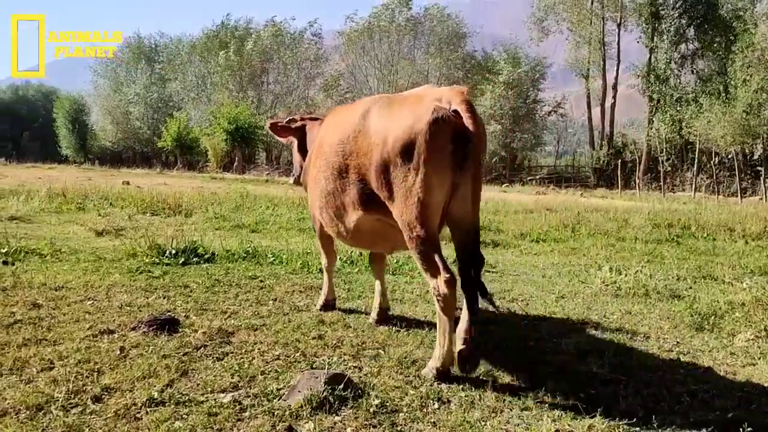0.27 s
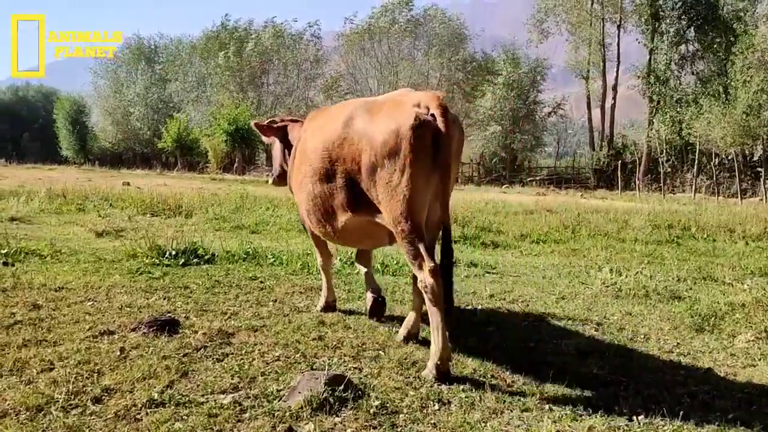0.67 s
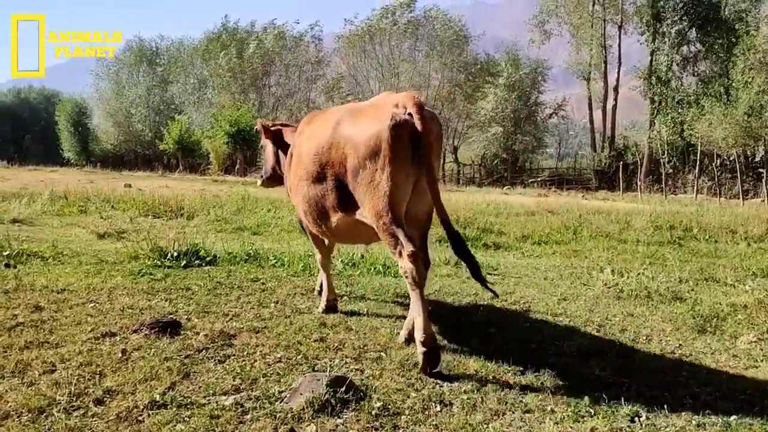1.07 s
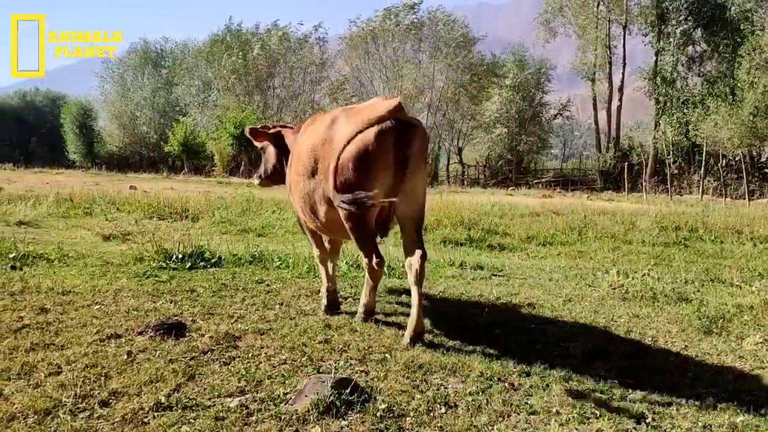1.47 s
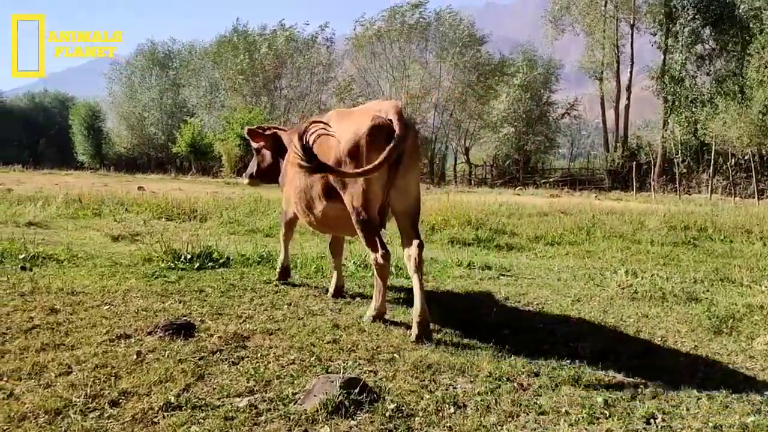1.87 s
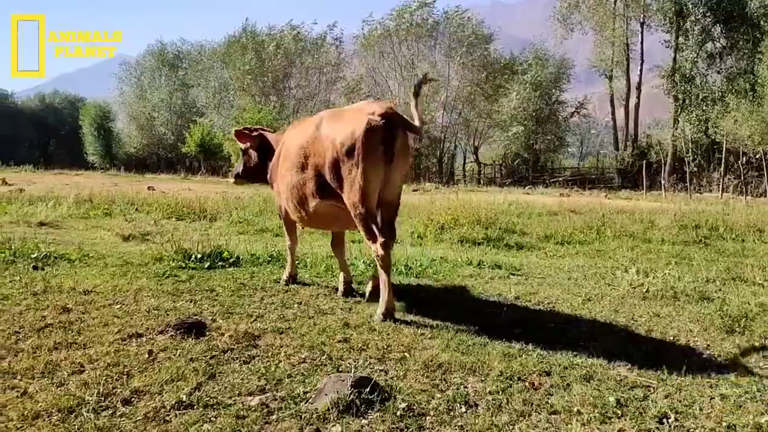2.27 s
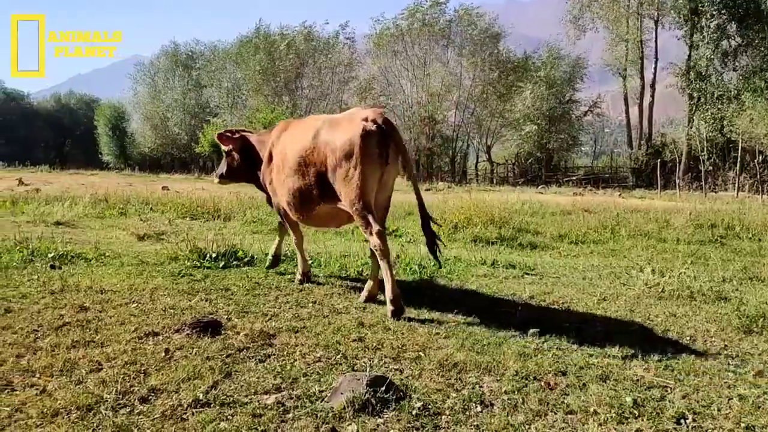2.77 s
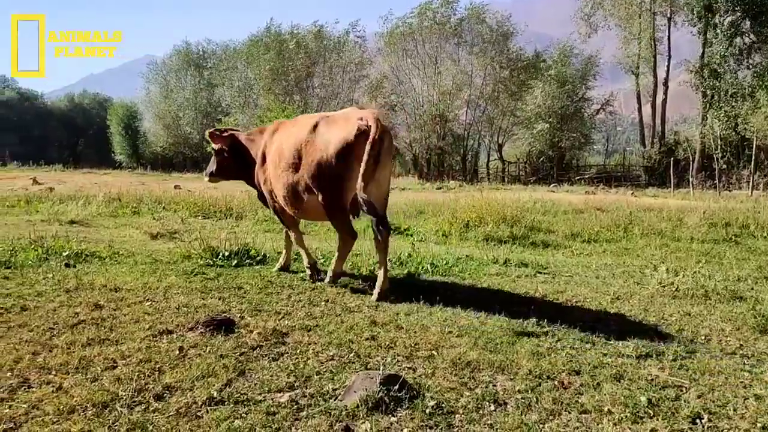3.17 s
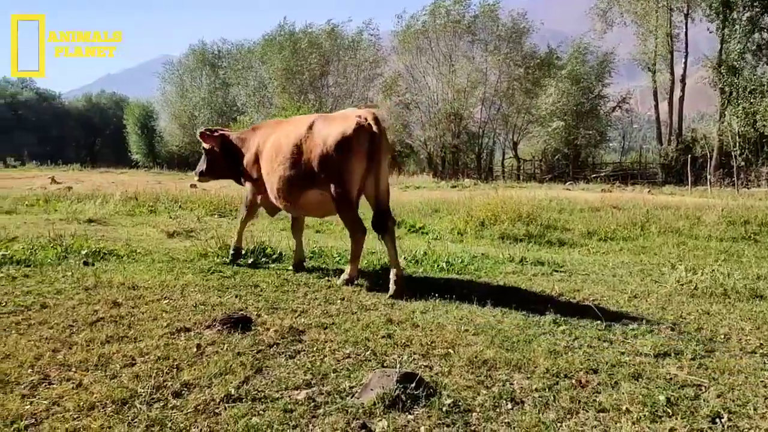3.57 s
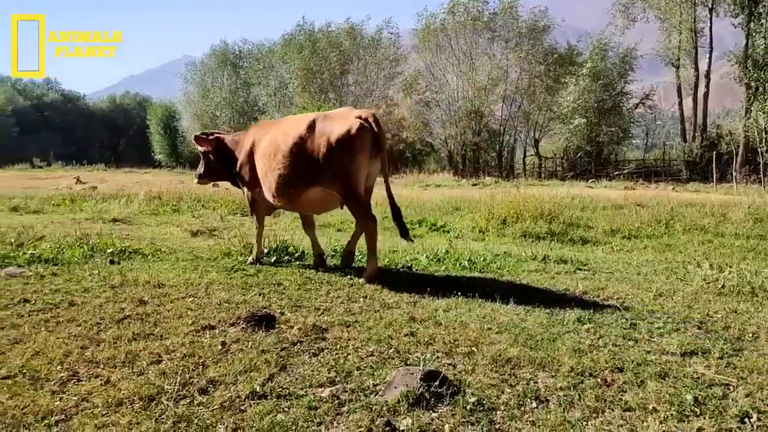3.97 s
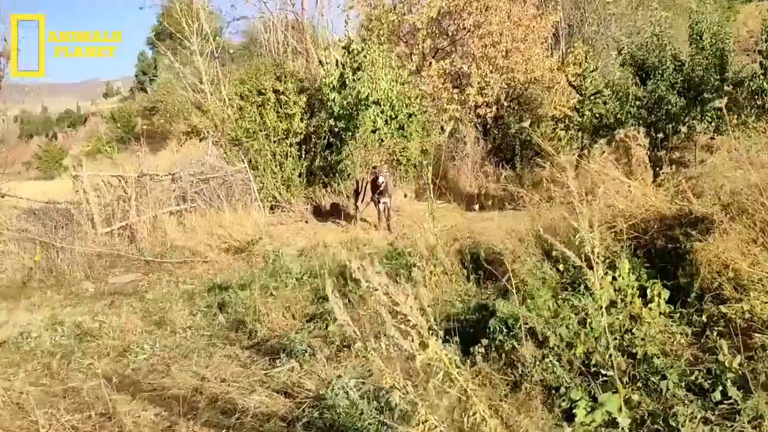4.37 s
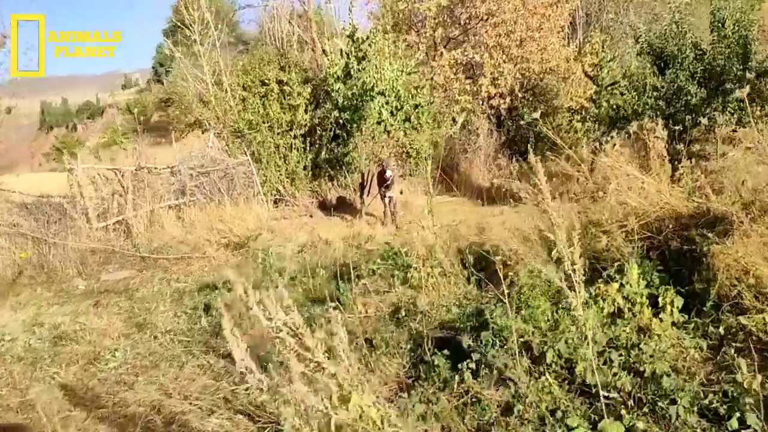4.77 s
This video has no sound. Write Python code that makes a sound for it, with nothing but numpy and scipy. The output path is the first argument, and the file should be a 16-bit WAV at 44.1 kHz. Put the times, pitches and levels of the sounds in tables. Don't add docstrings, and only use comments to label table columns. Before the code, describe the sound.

Leaf hiss, faint birds and wind buffeting, then a deep hum opening into a bellow, followed by a shorter, higher cow call and snapping dry grass.

```python
import sys
import numpy as np
from scipy import signal
from scipy.fft import rfft, irfft, next_fast_len
from scipy.io import wavfile
from scipy.ndimage import uniform_filter1d, map_coordinates

SR = 44100
rng = np.random.default_rng(int(sys.argv[2]) if len(sys.argv) > 2 else 0)


def inscribe(sig):
    pcm = np.round(np.clip(np.atleast_2d(sig).T, -1, 1) * 32767)
    wavfile.write(sys.argv[1], SR, pcm.astype(np.int16))


def magnitude_from_level(level_db):
    exponent = np.asarray(level_db, float) / 20
    return 10 ** exponent


N = 221734
TIME = np.arange(N) / SR


def unit(x):
    return x / np.sqrt(np.mean(x ** 2) + 1e-20)


def along(points, hz):
    f, v = np.transpose(points)
    return np.interp(np.log(hz + 1), np.log(f + 1), v)


def curves(rows):
    s, *cols = np.transpose(rows)
    return [np.interp(TIME, s, c) for c in cols]


def window(start_s, end_s, edge_s):
    return np.clip(np.minimum(TIME - start_s, end_s - TIME) / edge_s, 0, 1) ** 2


def ramp(start_s, end_s):
    return np.clip((TIME - start_s) / (end_s - start_s), 0, 1)


def swells(s, db, fall_s, rise=1):
    t = np.arange(0, N / SR + .002, .002)
    after = (t[:, None] - s) / fall_s
    power = magnitude_from_level(2 * (db - 10 * np.maximum(after, -after / rise)))
    return np.interp(TIME, t, np.sqrt(power.sum(axis=1)))


def wobble(rate_hz):
    knots = rng.standard_normal(int(N * rate_hz / SR) + 4)
    return map_coordinates(knots, [TIME * rate_hz], order=1)


def filtered(x, gain):
    m = 2 * next_fast_len(N // 2 + 4096)
    cepstrum = irfft(np.log(gain(np.fft.rfftfreq(m, 1 / SR)) + 1e-6), m)
    cepstrum[1:m // 2] *= 2
    cepstrum[m // 2 + 1:] = 0
    return irfft(rfft(x, m) * np.exp(rfft(cepstrum)), m)[..., :N]


def above(hz):
    return lambda f: f ** 2 / (f ** 2 + hz ** 2)


def throat(modes):
    def gain(f):
        return np.sqrt(sum(magnitude_from_level(2 * db) / (1 + ((f - hz) / (width / 2)) ** 2) ** 2 for hz, width, db in modes))
    return gain


def placed(x, pan_db):
    return np.array([x * magnitude_from_level(pan_db / 2), x * magnitude_from_level(-pan_db / 2)])


def widened(x, gain):
    mid, side = (x[0] + x[1]) / 2, gain * (x[0] - x[1]) / 2
    return np.array([mid + side, mid - side])


def rush(spectrum, alike):
    a, b = rng.standard_normal((2, N))
    turn = lambda hz: np.arccos(np.clip(along(alike, hz), 0, .99)) / 2
    mid = filtered(a, lambda hz: magnitude_from_level(along(spectrum, hz)) * np.cos(turn(hz)))
    side = filtered(b, lambda hz: magnitude_from_level(along(spectrum, hz)) * np.sin(turn(hz)))
    return unit(np.array([mid + side, mid - side]))


# start in seconds, peak in dB.
THUMPS_LARGE = [(.021, -27.5), (.068, -37), (1.09, -33.5), (1.615, -33.5), (1.675, -36), (1.93, -36),
                (1.955, -34.5), (2.103, -31), (2.215, -38), (2.33, -36), (3.86, -23), (3.985, -28),
                (4.06, -27.5)]
POPS_MIDDLE = [(0.17, -36.5), (2.056, -40), (2.535, -34.5), (2.605, -39), (2.684, -45), (3.354, -24.5),
               (3.398, -21), (3.644, -25), (3.588, -21), (3.599, -21.5), (3.609, -20), (4.108, -27),
               (4.13, -33), (4.148, -26.5), (4.168, -20.5), (4.227, -33.5), (4.279, -37), (4.569, -25.5),
               (4.648, -28.5), (4.771, -34.5), (4.897, -35), (4.974, -28.5)]
TICKS_SMALL = [(1.659, -39), (2.114, -40), (2.412, -38.5), (2.385, -41.5), (1.683, -41), (3.474, -21),
               (4.331, -34.5), (4.015, -31), (4.1, -37)]


def pops():
    out, t = np.zeros(N + SR), np.arange(SR // 25) / SR
    for eddies, hz in ((POPS_MIDDLE, 103.2), (TICKS_SMALL, 146.6), (THUMPS_LARGE, 70.7)):
        turn = 2 * np.pi * hz * t
        crest = np.sin(turn) + 0.116 * np.sin(2.3796 * turn)
        swing = np.exp(-((t - .008) * hz / 0.48) ** 2) * crest
        for s, db in eddies:
            out[round(s * SR):][:len(t)] += magnitude_from_level(db + 3.0) * swing
    return out[:N]


# time in seconds, strength in dB.
WIND_STRENGTH = [(0, -44.5), (.46, -59.5), (.9, -50.5), (1.3, -57.5), (1.8, -54.5), (2.5, -46.5),
                 (2.8, -48), (3.2, -36.5), (3.62, -34.5), (3.72, -39.5), (4.3, -49.5), (5.03, -52)]
# peak time in seconds, peak in dB, seconds to fall 10 dB, eddy size from large -1 to small 1.
GUSTS = [(.035, -36, 0.03, -0.81), (.2, -40, 0.005, -0.69), (.66, -40, 0.0968, -0.566),
         (1.08, -39.5, 0.1, 0.3983), (1.4, -46.5, 0.7, -1.086), (1.535, -44, 0.09, .7),
         (2.32, -39.5, 0.0085, 0.45), (.3, -49.5, 0.06, 0), (1.88, -44, 0.07, 0.41),
         (.79, -40, 0.0326, -0.091), (1.667, -38, 0.112, 0.285), (1.969, -39.5, 0, -0.4),
         (2.129, -41.5, 0.36, -0.69), (2.39, -41, 0.04, 0.46), (2.53, -38, 0.04, 0.083),
         (2.68, -41, 0.1304, 0.00048), (3.16, -30, 0.1164, 0.64), (3.615, -31, 0.01, 0.2),
         (3.88, -31, 0.0768, 0.273), (3.98, -31.5, 0.0517, 1.1), (4.12, -34, 0.03, 1.012),
         (4.172, -34, 0.0367, 1.03), (4.34, -34.5, 0.1, 0.016), (4.51, -45, 0.6, -0.01),
         (4.59, -38, 0.03, 1.04), (4.82, -40.5, 1.05, 0.176), (4.985, -34.5, 0.035, 0.31)]
# frequency in Hz, level in dB per Hz.
SWAY_SPECTRUM = [(6, -13), (18, 5), (35, 8.5), (50, 0), (80, -53.5)]
BUFFET_SPECTRUM = [(25, -43.5), (45, -7.5), (65, -1.5), (90, -8), (130, -20), (200, -74.5)]
FLUTTER_SPECTRUM = [(45, -44.5), (80, -3), (120, -5), (180, -10.5), (280, -23), (420, -35.5), (700, -99)]
# frequency in Hz, left-right likeness 0-1.
PORTS_ALIKE = [(25, 0.22), (60, 0.5526), (125, 0.72), (300, 0.94)]
# time in seconds, gain of the wind's left-right difference in dB.
PORTS_APART = [(0, 5), (2.55, 5.5), (2.75, 2), (3.9, -1), (4.1, -3), (5.03, -6)]


def wind(pan_db):
    strength_db, = curves(WIND_STRENGTH)
    s, db, fall_s, size = np.transpose(GUSTS)
    over_db = strength_db + 48

    def level(steady_db, eddy):
        gust_db = db - 13 * abs(size - eddy)
        return np.hypot(magnitude_from_level(steady_db), swells(s, gust_db, fall_s))

    sway_level = magnitude_from_level(1.5) * level(-49.5 + 0.575 * over_db + 3 * wobble(9), -1)
    sway = placed(sway_level, -2.69) * rush(SWAY_SPECTRUM, PORTS_ALIKE)
    lumps = unit(magnitude_from_level(2.7 * wobble(14)) * rush(BUFFET_SPECTRUM, PORTS_ALIKE))
    buffet = placed(magnitude_from_level(2.0) * level(strength_db, 0), pan_db / 2) * lumps
    lumps = unit(magnitude_from_level(4.6 * wobble(30)) * rush(FLUTTER_SPECTRUM, PORTS_ALIKE))
    flutter = placed(magnitude_from_level(3) * level(-55.5 + 1.54 * over_db, 1), pan_db) * lumps
    return widened(sway + buffet + flutter, magnitude_from_level(curves(PORTS_APART)[0])) + placed(pops(), pan_db)


def dulled(x, top_hz):
    near = ramp(4.13, 4.2)
    low_pass = signal.butter(8, top_hz, fs=SR, output="sos")
    return x * (1 - near) + near * signal.sosfiltfilt(low_pass, x)


# frequency in Hz, level in dB per Hz.
LEAF_SPECTRUM = [(120, -18), (200, -6), (320, -12), (700, -14), (3500, -16), (7700, -22), (8700, -29.5),
                 (15600, -45)]
# time in seconds, level in dB.
LEAF_LEVEL = [(0, -72.5), (2.7, -73), (3.45, -72.5), (4.05, -72.5), (4.25, -74.5), (4.35, -67.5),
              (4.55, -62.5), (5.03, -71)]
# frequency in Hz, left-right likeness 0-1.
LEAF_ALIKE = [(150, 0.047), (500, 0.874), (1200, 0.175), (3000, 0.207), (8000, 0.035)]


def trees():
    return magnitude_from_level(curves(LEAF_LEVEL)[0] + 13) * dulled(rush(LEAF_SPECTRUM, LEAF_ALIKE), 8600)


# peak time in seconds, peak in dB, seconds to fall 10 dB.
RUSTLES = [(.21, -72, .04), (.345, -60.5, .025), (.42, -70, .05), (.55, -70, .025), (.67, -67, .035),
           (1.645, -69, .03), (2.2, -65, .03), (2.62, -68, .04), (1.6, -79, 2.5), (2.97, -78, .3),
           (4.48, -59, .1), (4.56, -58, .1), (4.59, -49, .017), (4.65, -58.5, .08), (4.82, -59, .08),
           (4.92, -66, .03), (5, -75, .2)]
# frequency in Hz, level in dB per Hz.
STALK_SPECTRUM = [(500, -15), (2100, 7.5), (4000, -14.5), (7000, 3.5), (8800, -5.5), (12500, 0.5),
                  (14500, -3.5), (16000, -85)]
# start in seconds, peak in dB, low part in dB, left-right in dB.
SNAPS = [(0.004, -45, -12, -6), (0.3069, -45, -9, -6.5), (0.337, -44, -20, -15), (0.354, -45.5, -14, -6),
         (0.5363, -48.5, -20, -1.5), (1.6392, -61.5, -3.5, -3.5), (2.19, -56.5, -10.5, -9),
         (4.122, -49.5, 4, 4), (4.357, -54.5, 3.5, -2.5), (4.398, -58, 0, -8.5), (4.522, -44.5, 7, -12),
         (4.5808, -33.5, -1.5, -7), (4.5965, -52, 2, -8), (4.652, -46, -4, -9), (4.766, -54, 12, -16),
         (4.815, -41.5, 4, -11), (4.9089, -51, 1, -12), (5.0146, -41.5, -8.5, -10)]


def grass():
    grain = magnitude_from_level(1.6 * wobble(400) + 2.64 * wobble(40))
    stalks = unit(grain * rush(STALK_SPECTRUM, [(1000, 0.062)]))
    rustle = magnitude_from_level(4.0) * swells(*np.transpose(RUSTLES), rise=.8) * stalks
    high, low = np.zeros((2, 2, N + SR))
    t = np.arange(SR // 20) / SR
    for s, db, low_db, pan_db in SNAPS:
        burst = placed(magnitude_from_level(db - 60 * t / .012) * np.clip(t / .0012, 0, 1), pan_db)
        high[:, round(s * SR):][:, :len(t)] += burst
        low[:, round(s * SR):][:, :len(t)] += burst * magnitude_from_level(low_db)
    bright = rush([(3500, -34.0), (5000, 11.0), (14000, 3.0), (15000, -21.5)], [(1000, 0.45)])
    dull = rush([(300, -10), (600, 1.0), (2000, -2.5), (5000, -19.5)], [(1000, 0.77)])
    return rustle + magnitude_from_level(-4.0) * high[:, :N] * bright + magnitude_from_level(3.0) * low[:, :N] * dull


# start in seconds, end in seconds, level in dB.
FAR_NOTES = [
    (0.336, 0.472, -70),
    (0.452, 0.722, -78),
    (0.699, 0.798, -68),
    (0.799, 1.039, -68.5),
    (1.017, 1.312, -70.5),
    (1.271, 1.44, -73),
    (1.499, 1.607, -79.5),
]
# time in seconds, strongest partial in Hz.
FAR_PITCH = [(.33, 1080), (.7, 1081), (.95, 1052), (1.6, 1052)]
# start in seconds, end in seconds, frequency in Hz, level in dB.
FAR_UPPER = [(.34, .45, 2460, -80), (.49, .6, 2460, -82), (.66, .79, 2450, -81), (.37, .46, 5100, -86),
             (.64, .76, 3950, -86), (.46, .61, 4060, -85), (.46, .57, 3550, -89), (1.1, 1.42, 2370, -88),
             (4.04, 4.22, 1900, -82)]


def far_cow():
    def line(hz):
        return magnitude_from_level(2.8 * wobble(16)) * np.sin(2 * np.pi * np.cumsum(hz + 3 * wobble(30)) / SR)

    notes = sum(magnitude_from_level(db + 6.0) * window(s, end, 0.0244) for s, end, db in FAR_NOTES)
    main = notes * line(curves(FAR_PITCH)[0])
    upper = sum(magnitude_from_level(db + 15.0) * window(s, end, 0.0347) * line(hz) for s, end, hz, db in FAR_UPPER)
    return main + upper


# start in seconds, end in seconds, from Hz, to Hz, level in dB.
CHIRPS = [(0.356, 0.399, 4000, 3080, -68), (0.4, 0.45, 3898, 3285, -72.5),
          (0.403, 0.459, 4947, 5070, -74.5), (0.751, 0.832, 4910, 3490, -71),
          (0.82, 0.867, 4294, 3500, -72.5), (0.884, 0.949, 3798, 4656, -75.5),
          (1.063, 1.106, 4590, 5060, -73.5), (1.107, 1.137, 5853, 5340, -74),
          (1.193, 1.223, 3680, 4320, -74.5), (1.295, 1.333, 4325, 2760, -68),
          (1.341, 1.366, 3920, 2700, -74), (1.776, 1.861, 4710, 3370, -69), (1.859, 1.933, 4568, 3300, -72),
          (2.052, 2.107, 4234, 3083, -76), (2.367, 2.442, 4688, 5060, -75), (2.448, 2.495, 5359, 3590, -71),
          (2.514, 2.548, 3040, 3682, -71.5), (4.136, 4.224, 5211, 4237, -76)]
WHISTLES = [
    (4.146, 4.165, 4650, 4485, -68),
    (4.176, 4.239, 4534, 4450, -77.5),
    (4.954, 4.965, 4052, 4103, -70),
]


def birds():
    out = np.zeros(N)
    calls = [(*call, 540 * magnitude_from_level(.45 * (call[-1] + 70))) for call in CHIRPS]
    calls += [(*call, 125) for call in WHISTLES]
    for s, end, hz, to_hz, db, spread_hz in calls:
        glide = 2 * np.pi * np.cumsum(np.interp(TIME, [s, end], [hz, to_hz])) / SR
        smear = 0.44 + wobble(2.6 * spread_hz)
        out += magnitude_from_level(db + 7.0) * window(s - .02, end + 0.022, 0.0242) * smear * np.sin(glide)
    return out


# time in seconds, pitch in Hz at full voice, effort in dB.
MOO = [
    (2.64, 93.8, -47),
    (2.74, 95.99, -42.5),
    (2.904, 106.4, -40),
    (3.01, 102.6, -40),
    (3.479, 104.5, -41),
    (3.6, 102.1, -41),
    (3.798, 93.06, -42.5),
    (3.918, 83.12, -43),
    (4.17, 69.8, -66),
]
# frequency in Hz, width in Hz, level in dB.
CLOSED = [(92.81, 47.97, 22.5), (204, 51.87, 17), (390, 227.1, -1.5), (897, 380, -10), (1677, 116, 0),
          (1940, 99, -2), (2370, 180, 2.5), (2888, 43, -8.5), (3550, 170, -4), (1293.4, 390, -12),
          (607.9, 79, -3)]
OPEN = [(105.24, 106, 5), (201.3, 66.4, 6), (490, 211.73, -7.5), (633.3, 49, -4), (834, 180, -14.5),
        (1018, 22, 0), (1150, 94.6, 2.5), (1364.4, 58, -1.5), (1730, 320, -15), (2159.6, 117, -15.5),
        (2320, 310, -12.5), (2839.5, 106, -15), (3392.7, 500, -21.5), (4000, 109.2, -24.5),
        (4483, 120.25, -25), (4770, 90.5, -34), (6600, 2400, -38.5), (9965, 1800, -41)]
SLACK = [(95.67, 72.6, 6.5), (190.15, 140, 5), (268, 28, 13), (433.97, 245, -12), (684.5, 247.5, -9),
         (1030, 80, -4.5), (1131.7, 88, 2), (1367, 84, -2.5), (1701, 318, -13.5), (2246, 230, -16),
         (2403.5, 111.1, -16), (2826, 280, -18.5), (3360, 1216.5, -29), (5539, 1970, -36.5),
         (7360, 4283, -43.5)]
NOSTRILS = [(3030, 350, 5.5), (3590, 220, 2), (4217.8, 163, -2.5), (4670, 564, -1.5), (5740, 1241, -13)]


def moo():
    start_s, end_s = MOO[0][0], MOO[-1][0]
    hz, db = curves(MOO)
    closed, slack, tired = 1 - ramp(3.025, 3.045), ramp(3.51, 3.65), ramp(3.8, 4.1)
    breath = .05 + .14 * closed + .3 * slack + .45 * tired
    jitter = .0014 + .002 * closed + .0065 * slack + .011 * tired
    flicker_db = 2.2 + closed + 2.8 * slack
    swell = ramp(3.008, 3.088)
    db = db - 11 * (1 - swell)
    hz = hz - 3 * (1 - swell)
    phase = 2 * np.pi * np.cumsum(hz * (1 + jitter * wobble(70))) / SR

    on = slice(round(start_s * SR), round(end_s * SR))
    knots_s = np.arange(start_s, end_s, .03)
    scatter = rng.uniform(-.9, .9, 120)

    def flicker(k):
        curve = np.interp(TIME[on], knots_s, rng.standard_normal(len(knots_s)))
        return magnitude_from_level(min(k / 8, 1) * flicker_db[on] * curve)

    pulses = np.zeros(N)
    pulses[on] = sum(2 * flicker(k) * np.cos(k * phase[on] - .22 * k * k + scatter[k]) for k in range(1, 116))
    air = rng.standard_normal((2, N)) * (1 + .45 * np.cos(phase))
    sounding = window(start_s, end_s, 0.0533)
    level = magnitude_from_level(db + 1.5 * breath * wobble(45)) * sounding

    late = .6 + .4 * ramp(2.71, 2.79)
    hiss = filtered(late * level * np.sqrt(breath) * 16 * air[0], above(700))
    source = level * np.sqrt(1 - breath) * pulses + hiss

    snort = magnitude_from_level(-55 - 17 * ramp(2.82, 3.0479)) * window(2.65, 3.06, 0.06447)
    seep = magnitude_from_level(-55.5 - 37 * ramp(3.045, end_s)) * swell
    nose_air = unit(filtered(air[1] + .06 * pulses, throat(NOSTRILS)))
    nose = (snort + seep) * sounding * nose_air

    voice = magnitude_from_level(-10.0) * filtered(source * closed, throat(CLOSED))
    voice += magnitude_from_level(-4.5) * filtered(source * slack, throat(SLACK))
    voice += magnitude_from_level(-4.5) * filtered(source * (1 - closed - slack), throat(OPEN))
    low = signal.sosfiltfilt(signal.butter(4, 847, fs=SR, output="sos"), voice)
    upper_db = -4 * (1 - ramp(2.74, 2.79)) - 4 * ramp(3.93, 4.03)
    return low + (voice - low) * magnitude_from_level(upper_db) + nose


# time in seconds, pitch in Hz, level in dB, mouth from shut -1 to wide 1.
SECOND_CALL = [
    (4.252, 456.7, -67, -0.582),
    (4.265, 457.3, -46, -0.485),
    (4.372, 456, -36, -0.29),
    (4.498, 456.3, -40.5, -0.062),
    (4.645, 461.4, -42, 0.198),
    (4.836, 450.6, -43, 0.79),
    (4.88, 469.6, -48.5, 0.1095),
    (4.921, 482, -46, -0.702),
    (4.97, 479, -79.5, -0.155),
]
THIRDS_DB = [-10, -22, 0, -19, -11, -8, -22, -4, -8, -13, -13, -19, -17, -19, -36, -38, -90, -36, -27, -29,
             -35, -19, -21, -30, -20, -34]
# frequency in Hz, width in Hz, level in dB.
HOARSE = [(510, 183, 0.5), (1207, 587, 2), (1850, 400, -2), (3485, 450, -8)]


def second_call():
    hz, db, mouth = curves(SECOND_CALL)
    first = db - 25 * np.clip(mouth, 0, 1)
    second = db - 25 * np.clip(-mouth, 0, 1)
    third = second - 1.5 - 12 * ramp(4.513, 4.94)
    beat_db = db - 5 - 33.5 * ramp(4.498, 4.67)
    phase = 2 * np.pi * np.cumsum(hz / 3 * (1 + .0007 * wobble(60))) / SR
    between = dict(enumerate(THIRDS_DB, 1))
    own = {3: first, 6: second, 9: third, 12: third - 18, 21: third - 24, 24: second - 26,
           18: second - 21 - .5 * np.clip(beat_db + 60, 0, 30)}

    sharp, narrow = ramp(4.27, 4.34), ramp(4.39, 4.47)
    sharp_db = 2.5 * (.5 - sharp)
    middle_db, top_db = sharp_db - 5.5 * narrow, sharp_db + 2 * narrow
    lower_db = {5: -0.5 * narrow, 7: 10 * (1 - sharp)}

    def beat(k):
        tilt_db = top_db if k > 18 else middle_db if k > 9 else lower_db.get(k, 0)
        return beat_db + between[k] - between[8] + tilt_db

    def level(k):
        return np.maximum(own.get(k, -120), beat(k) if k > 9 or k % 3 else -120)

    def lag(k):
        return .11 * k * k + (k % 3 == 0)

    voice = sum(magnitude_from_level(level(k) + (.7 + .04 * k) * wobble(40)) * np.sin(k * phase - lag(k)) for k in between)
    hoarse_air = unit(filtered(rng.standard_normal(N), throat(HOARSE)))
    hoarse = magnitude_from_level(beat_db - 11.5) * hoarse_air * (1 + 0.91 * np.cos(phase))

    bank = magnitude_from_level(-47 + 3.5) * np.cos(3 * phase - lag(3)) + magnitude_from_level(-55 + 3.5) * np.cos(6 * phase - lag(6))
    bounce = window(4.255, 4.94, 0.1326) * bank
    bounce -= magnitude_from_level(-2.5) * window(4.255, 4.94, 0.0113) * filtered(voice, above(1501))
    return bounce, (np.sqrt(2) * voice + hoarse) * window(SECOND_CALL[0][0], SECOND_CALL[-1][0], 0.0068)


# frequency in Hz, t60 in seconds.
FIELD_T60 = [(100, 0.1), (1000, 0.56057), (4000, 1), (12000, 0.596)]


def field(x):
    hz, t, z = signal.stft(rng.standard_normal((2, SR // 2)), SR, nperseg=256)
    decay = magnitude_from_level(-60 * t / along(FIELD_T60, hz)[:, None])
    tail = signal.istft(z * decay, SR, nperseg=256)[1]
    late = np.pad(x, (400, 0))[None]
    return signal.fftconvolve(late, tail / np.linalg.norm(tail[0]), axes=1)[:, :N]


# time in seconds, wind left-right in dB, hiss left-right in dB.
LEAN = [(0, 3, -4), (.45, 4.5, -2.5), (1.19, -4.5, -1.5), (1.34, 16.5, -3), (2.04, -15, -2),
        (2.74, -5.5, -3), (3.75, -2, -2), (4.31, 1, -6), (5.03, -1, -2.5)]


def scene():
    wind_pan_db, hiss_pan_db = curves(LEAN)
    air = wind(wind_pan_db) + placed(1.0, hiss_pan_db) * (trees() + grass())
    chirps = birds()
    far = placed(magnitude_from_level(4.0) * chirps + far_cow(), -0.45) + magnitude_from_level(-1.5) * field(chirps)
    first, (bounce, second) = moo(), second_call()
    cows = placed(first, 0.07) + placed(second, -0.89) + [bounce, -bounce]
    cows += magnitude_from_level(-12.5) * (widened(field(first), magnitude_from_level(-11)) + field(second))
    return cows + far + air


def masked(x):
    hz, _, z = signal.stft(np.array([x[0] + x[1], x[0] - x[1]]) / 2, SR, nperseg=2048)
    power = uniform_filter1d(abs(z) ** 2, size=9, axis=1)
    power = uniform_filter1d(power, size=3, axis=2)
    outside = ((hz < 350) | (hz > 1900))[:, None]
    z[1] *= (power[1] > power[0] * magnitude_from_level(2 * -22)) | outside
    mid, side = signal.istft(z, SR, nperseg=2048)[1][:, :N]
    return np.array([mid + side, mid - side])


def top_cut(x):
    return signal.sosfilt(signal.butter(12, 15620, fs=SR, output="sos"), x)


def record(dry):
    mix = masked(dulled(dry, 14400))
    return top_cut(mix)


dry = scene()
out = record(dry)
inscribe(out)
```